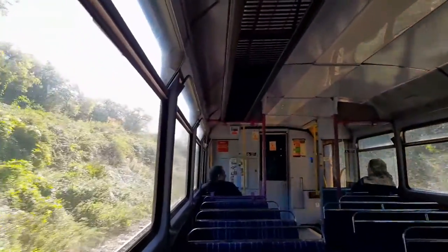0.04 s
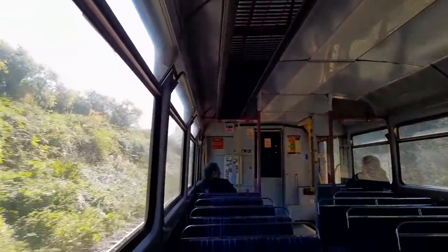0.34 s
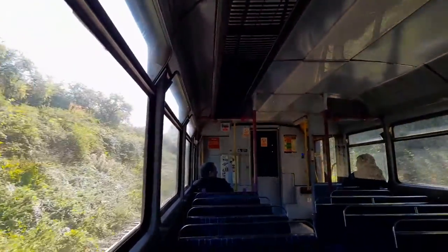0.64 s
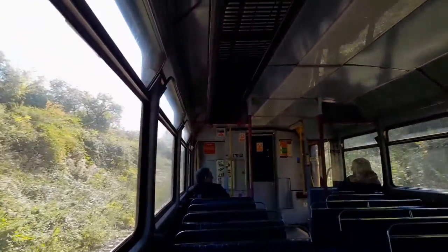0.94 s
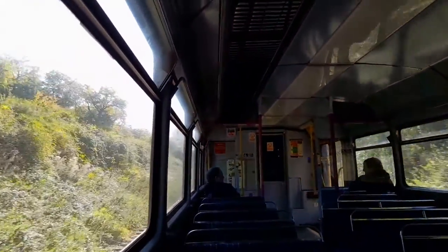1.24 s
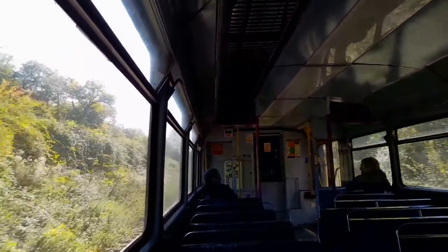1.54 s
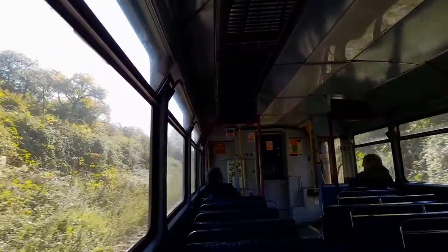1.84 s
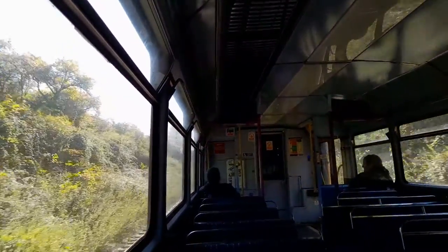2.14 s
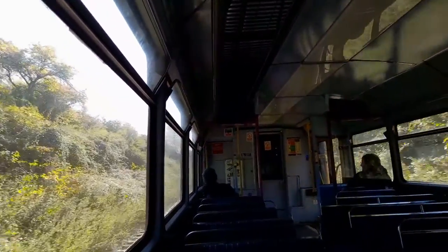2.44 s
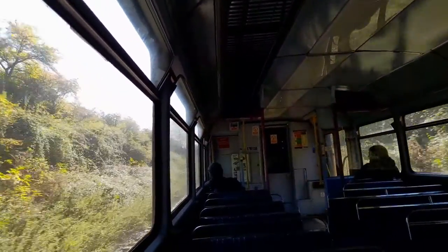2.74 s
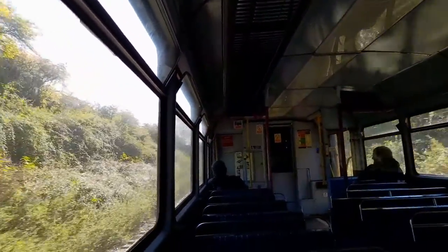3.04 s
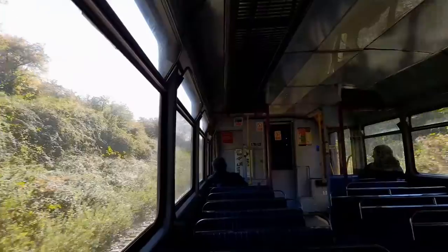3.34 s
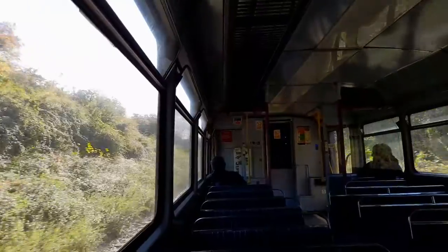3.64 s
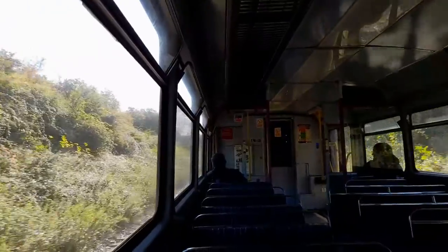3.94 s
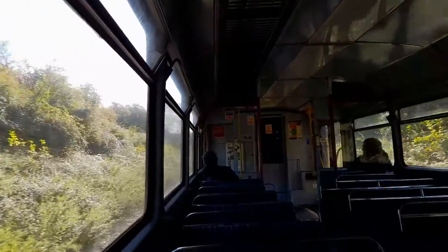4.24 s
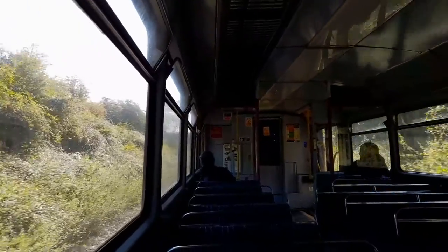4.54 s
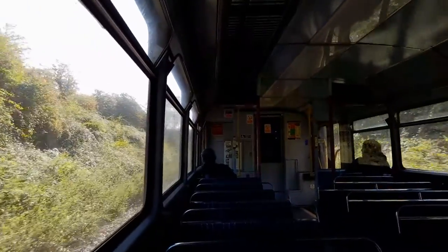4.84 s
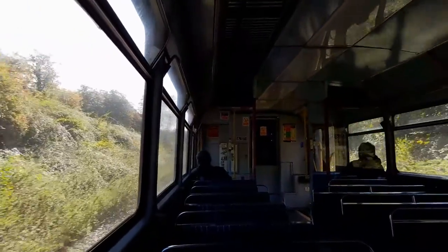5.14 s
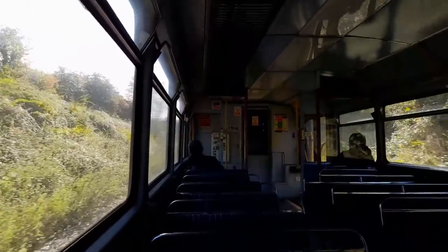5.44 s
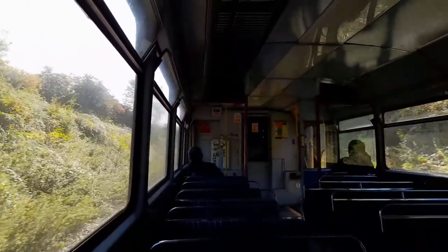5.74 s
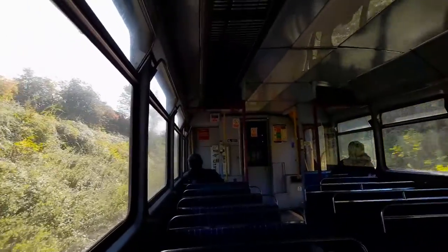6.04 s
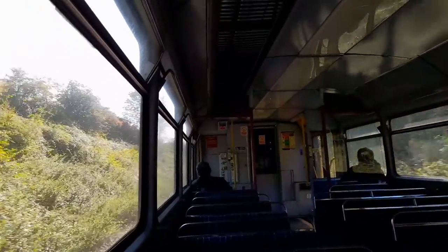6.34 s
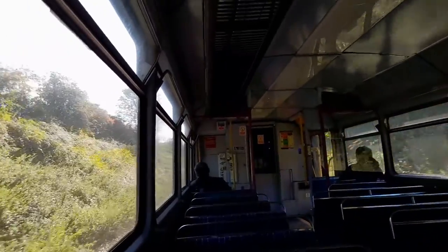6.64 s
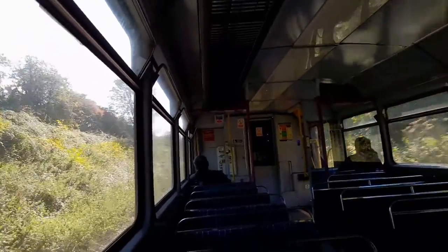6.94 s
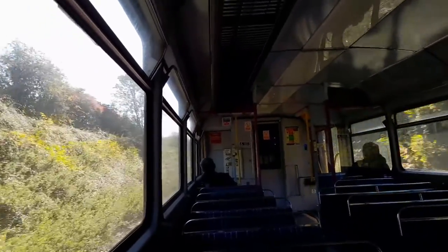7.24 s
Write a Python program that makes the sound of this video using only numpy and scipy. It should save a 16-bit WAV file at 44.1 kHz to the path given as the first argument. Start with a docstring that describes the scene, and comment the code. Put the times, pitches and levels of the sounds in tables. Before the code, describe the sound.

From a passenger seat in a moving train, a low, pulsing diesel drone blends with rumble and rolling wheel noise, and an uneven wheel drums softly under the floor. Regular thumps from the track joints soon begin, setting off short metal clanks and rattles of loose doors and windows. The carriage booms now and then, trim ticks lightly close by, and the thumps bunch together at the end.

```python
"""Inside a diesel railcar running at a steady speed on jointed track.
From the start two underfloor engines beat over the rumble of the body and the roar of the wheels,
an out-of-round wheel drums the floor once a turn, and small fittings tick and sizzle nearby.
From 0.7 s a rail joint every 0.8 s thumps up through the floor, often with a clank of steel and a chatter
of doors and windows. The body booms in occasional dips; after 6.3 s the thumps come in a quick run."""
import sys
import numpy as np
from scipy import signal
from scipy.fft import rfft, irfft
from scipy.io import wavfile

SR = 44100
rng = np.random.default_rng(int(sys.argv[2]) if len(sys.argv) > 2 else 0)


def wrap_up_sound(samples):
    """Save the sound to the file named by the first command line argument, as 16-bit audio."""
    columns = np.atleast_2d(samples).T
    # keep every value between -1 and 1, then stretch to whole-number steps
    tamed = np.clip(columns, -1, 1)
    steps = np.round(tamed * 32767).astype(np.int16)
    wavfile.write(sys.argv[1], SR, steps)


N = 321489
TIME, FREQ = np.arange(N) / SR, np.fft.rfftfreq(N, 1 / SR)


def amp(db):
    """Amplitude ratio of a level in decibels."""
    return 10 ** (np.asarray(db) / 20)


def unit(x):
    """Normalisation to rms 1."""
    return x / np.sqrt(np.mean(x ** 2) + 1e-20)


def over_hz(points):
    """Interpolation on a logarithmic frequency axis."""
    hz, value = np.transpose(points)
    return np.interp(np.log(FREQ + 1), np.log(hz + 1), value)


def over_time(rows):
    """Gain per sample, interpolated in decibels."""
    return amp(np.interp(TIME, *np.transpose(rows)))


def band(points):
    """Band-pass spectrum in dB, falling 60 dB per octave beyond its end points."""
    octaves_outside = np.maximum(np.log2(points[0][0] / (FREQ + 1)), np.log2((FREQ + 1) / points[-1][0]))
    return over_hz(points) - 60 * np.maximum(octaves_outside, 0)


def resonances(modes):
    """Each mode adds a Lorentzian peak to a spectrum in dB."""
    return sum(db / (1 + (2 * (FREQ - hz) / width) ** 2) for hz, width, db in modes)


def wander(rate_hz):
    """Random modulation: low-pass noise of rms 1."""
    return unit(irfft(rfft(rng.standard_normal(N)) * np.exp(-(FREQ / rate_hz) ** 2), N))


def steady(x, seconds):
    """Division by the running rms evens out swells slower than the given time."""
    window = np.exp(-(FREQ * seconds) ** 2)
    power = np.abs(irfft(rfft((x ** 2).mean(0)) * window, N))
    return x / np.sqrt(power + 1e-9)


def blow(start_s, rise_s, t60_s):
    """Envelope of a damped response: a quick rise to 1, then exponential decay."""
    age = np.maximum(TIME - start_s, 0)
    shape = (1 - np.exp(-age / rise_s)) * np.exp(-np.log(1000) * np.minimum(age / t60_s, 10))
    return shape / (shape.max() + 1e-9)


def contacts(per_s):
    """Poisson process: independent impacts of random size, rms 1."""
    return unit(rng.standard_normal(N) * (rng.random(N) < per_s / SR))


# likeness of the sound at the two ears: frequency_hz, coherence_ratio
COHERENCE = [(30, .99), (90, .98), (150, .99), (250, 0.82), (500, 0.59), (800, 0.17), (1200, 0)]
def diffuse(shape_db):
    """Diffuse field: long waves reach both ears alike, short waves are uncorrelated."""
    a, b = rfft(rng.standard_normal((2, N)))
    coherence = np.clip(over_hz(COHERENCE), 0, 1)
    mid, side = a * np.sqrt(1 + coherence), b * np.sqrt(1 - coherence)
    return unit(irfft(np.array([mid + side, mid - side]) * amp(shape_db), N))


def ring_out(force, shape_db, t60_s):
    """Convolution: each impact excites the same decaying response in the saloon."""
    tail = (diffuse(shape_db) * blow(0, rise_s=0.0006, t60_s=t60_s))[:, :SR // 3]
    return signal.oaconvolve(force[None], tail / np.sqrt(np.sum(tail ** 2) / 2), axes=1)[:, :N]


# response of the car body: frequency_hz, density_db
BODY_SPECTRUM = [(20, -26), (27, -21), (35, -20), (41, -7.5), (46, 5), (55, -1), (67, 9.5), (75, 2),
                 (84, 2), (98, 3.5), (113, -1.5)]
# rumble from the roughness of the track: time_s, level_db
TRACK_ROUGHNESS = [(0, -27.5), (.5, -29.5), (.95, -27), (1.4, -26.5), (1.8, -29), (2.05, -28.5), (2.5, -31),
                   (2.65, -34), (2.85, -25), (3.3, -30), (3.7, -29), (4.12, -26), (4.35, -28), (4.8, -29),
                   (5.3, -30.5), (5.9, -26.5), (6.35, -30), (6.7, -25), (7.29, -27)]
def body_rumble(gain_db=0.87, lumpy_db=0.9):
    """Random forcing: rough track drives the low resonances of the body unevenly."""
    rumble = over_time(TRACK_ROUGHNESS) * steady(diffuse(band(BODY_SPECTRUM)), seconds=0.21)
    return amp(gain_db + lumpy_db * wander(rate_hz=31.0)) * rumble


# partials of an engine: firing_rate_ratio, level_db
ENGINE_ORDERS = [(.5, -13.5), (1, -1.5), (1.5, -17.5), (2, -20), (2.5, -47), (3.5, -29), (6, -25)]
# drone of each engine: time_s, firing_hz, level_db
NEAR_DRONE = [(0, 80.18, -29.0), (0.2, 80.56, -30.5), (0.45, 79.81, -23.0), (0.75, 79.62, -28.5),
              (1.05, 78.96, -39.0), (1.7, 79.71, -30.5), (2.4, 80.76, -25.5), (2.8, 79.36, -28.0),
              (3.1, 79.15, -35.5), (3.5, 79.45, -31.5), (4.1, 80.29, -26.0), (4.7, 79.92, -28.0),
              (5.2, 79.11, -32.5), (5.9, 79.69, -28.0), (6.3, 80.2, -29.0), (6.6, 78.07, -41.5),
              (7, 80.15, -30.5), (7.29, 80.17, -27.0)]
FAR_DRONE = [(0, 87.59, -33.0), (0.8, 87.33, -35.0), (1.2, 87.5, -31.5), (1.9, 87.7, -35.0),
             (2.4, 87.72, -27.0), (2.75, 87.1, -31.5), (3.2, 87.92, -28.5), (3.85, 88.5, -41.5),
             (4.25, 88.15, -28.5), (4.65, 88.39, -33.0), (5, 86.29, -41.0), (5.5, 88.39, -41.5),
             (5.9, 87.58, -25.0), (6.3, 87.32, -34.5), (6.7, 88.66, -33.5), (7.29, 88.43, -33.5)]
# brief surges of both drones: centre_s, lift_db
DRONE_SURGES = [(.43, 3), (2.48, 2.5), (3.95, 2), (4.18, 0), (5.91, 4)]
def engines(gain_db=0.5, uneven_db=1.5, left_lead_rad=0.23, in_step_s=0.028, surge_s=0.031):
    """Beating: two engines fire at slightly different rates, so their sum throbs."""
    out = np.zeros((2, N))
    lead = np.array([[left_lead_rad], [0]])  # the saloon's standing wave: the left ear leads
    offsets = rng.random(len(ENGINE_ORDERS))
    for rows in (NEAR_DRONE, FAR_DRONE):
        time_s, firing_hz, level_db = np.transpose(rows)
        cycles = np.cumsum(np.interp(TIME, time_s, firing_hz)) / SR
        cycles -= np.interp(in_step_s, TIME, cycles)
        hum = sum(amp(db) * np.sin(2 * np.pi * (order * cycles + offset) + lead)
                  for (order, db), offset in zip(ENGINE_ORDERS, offsets))
        out += np.interp(TIME, time_s, amp(level_db)) * amp(uneven_db * wander(rate_hz=4.7)) * unit(hum)
    surge_db = sum(db * np.exp(-((TIME - centre_s) / surge_s) ** 2) for centre_s, db in DRONE_SURGES)
    return amp(gain_db + surge_db) * out


def wheel_bump(turns_hz=4.643, low_spot_s=0.074, sharpness=1.6):
    """Periodic forcing: a pulse rises to 1 each time the wheel's low spot meets the rail."""
    return np.exp(sharpness * (np.cos(2 * np.pi * turns_hz * (TIME - low_spot_s)) - 1))


# response of the floor: frequency_hz, density_db
FLOOR_SPECTRUM = [(116, 5.5), (132, 4.5), (147, 2.5), (165, 1.5), (184, 7), (205, 0.5), (224, 3),
                  (243, -3.5), (256, -8)]
# how hard the out-of-round wheel bears on the rail at each turn: time_s, lift_db
WHEEL_LOADING = [(0, 6.5), (1.3, 9.5), (2.0, 7.5), (3.6, 7.5), (4.4, 5), (5.4, 8), (6.2, 3), (6.6, 6),
                 (7.29, 8)]
def floor_drumming(level_db=-35.0):
    """Amplitude modulation: the out-of-round wheel swells the floor's noise once a turn."""
    vibration = steady(diffuse(band(FLOOR_SPECTRUM)), seconds=0.46)
    return amp(level_db) * over_time(WHEEL_LOADING) ** wheel_bump() * vibration


# midrange of the wheels on the rails: frequency_hz, density_db
ROAR_SPECTRUM = [(258, 2), (310, 2.5), (355, -2), (440, -3), (478, 1), (530, -2), (620, -6), (750, -7),
                 (840, -7), (910, -15), (1050, -19.5)]
def wheel_roar(level_db=-32.0, bump_db=1.57, uneven_db=1.0):
    """Rolling noise: the wheels roar on the rails, a little louder once a turn."""
    gain = amp(level_db + bump_db * wheel_bump() + uneven_db * wander(rate_hz=14.0))
    return gain * steady(diffuse(band(ROAR_SPECTRUM)), seconds=0.085)


# treble of the rolling noise: frequency_hz, density_db
HISS_SPECTRUM = [(1000, 2), (1350, 1.1), (1700, 0.5), (1900, -1.1), (2300, -5), (2950, -9), (3700, -13.5),
                 (4600, -17.5), (5600, -18.5), (6500, -22.5), (7300, -21.5), (7900, -29.5), (10000, -29.5),
                 (15500, -33)]
# modes of the wheel discs: centre_hz, width_hz, lift_db
DISC_MODES = [(2000, 68, 2.5), (2524, 120, 5), (3270, 116, 7), (4195, 380, 7.5), (5110, 220, 6),
              (6050, 200, 3.5), (7030, 350, 3.5)]
# hiss along the track: time_s, level_db
HISS_CURVE = [(0, -44), (.55, -44.5), (1.35, -45), (1.6, -44.5), (1.95, -44.5), (2.3, -44), (2.8, -45.3),
              (3.2, -45), (3.55, -45.6), (3.85, -44), (4.2, -44), (4.6, -44.5), (5.2, -44.5), (6.5, -45),
              (7.29, -44)]
def wheel_hiss(jolt_db=2.1, flutter_db=0.58):
    """Resonant filtering: the wheel discs ring faintly in a hiss that swells after each jolt."""
    hiss = over_time(HISS_CURVE) * diffuse(band(HISS_SPECTRUM) + resonances(DISC_MODES))
    return amp(jolt_db * jolts() + flutter_db * wander(rate_hz=20.0)) * hiss


# response of small metal fittings: frequency_hz, density_db
FITTING_SPECTRUM = [(6000, -20), (9800, -8), (11300, -8), (12000, -7), (12650, 0), (14000, -6), (16000, -5)]
# ticks of those fittings: start_s, level_db, left_over_right_db, pitch_hz
FITTING_TICKS = [(.355, -43, 2, 12350), (.7026, -51, 3, 11200), (.8708, -56, -1.5, 12100),
                 (1.155, -56, -1.5, 11300), (1.5846, -59, 1, 11500), (2.1399, -58, -3, 12300),
                 (2.9538, -57, 3, 11100), (3.1436, -59, -1.5, 11400), (3.2069, -50, -1.5, 11600),
                 (3.2644, -54, -1, 12600), (3.5232, -56, -2.5, 11600), (3.8231, -58, 4, 10400),
                 (4.1339, -54, -5, 11300), (4.195, -55, -2, 11600), (4.32, -54, -4, 11500),
                 (4.9494, -53, -1, 10800), (5.3745, -52, -3.5, 11100), (5.4563, -51, -2, 12100),
                 (5.6953, -52, 2, 11200), (5.878, -52, -3, 11200), (6.0026, -52.5, -5, 11000),
                 (6.308, -57, -4, 11000), (6.4371, -56, -2, 10900), (6.5723, -54, -2.5, 11600)]
def fitting_ticks(click_db=-12.0, ring_db=-8.5, ring_width_hz=850.0):
    """Impact excitation: a bright click, then a narrow band ringing at each part's own pitch."""
    noise = diffuse(band(FITTING_SPECTRUM))
    blur = np.array([wander(ring_width_hz), wander(ring_width_hz)])
    out = np.zeros((2, N))
    for start_s, db, pan_db, hz in FITTING_TICKS:
        click = amp(click_db) * blow(start_s, rise_s=0.0015, t60_s=0.1) * noise
        ring = amp(ring_db) * blow(start_s, rise_s=0.003, t60_s=0.15) * np.sin(2 * np.pi * hz * TIME)
        out += amp([[db + pan_db / 2], [db - pan_db / 2]]) * (click + blur * ring)
    return out


# sizzle of loose trim: frequency_hz, density_db
TRIM_SPECTRUM = [(6000, 4.5), (8000, 0), (9700, -5.5), (11300, 2.5), (13000, -6), (15500, -7)]
# modes of its faint tinkles: centre_hz, width_hz, lift_db
TRIM_MODES = [(10550, 300, 3), (11250, 350, 6), (11920, 150, 2), (12600, 300, 4)]
# bursts of shaking: centre_s, half_length_s, level_db
TRIM_FLURRIES = [(0, 0.058, -58), (.17, 0.16, -68), (0.392, 0.067, -58), (.69, .04, -66), (.89, 0.052, -63),
                 (.98, .03, -68), (1.62, 0.12, -66), (2.41, .04, -65), (3.28, .04, -70), (3.67, .05, -71),
                 (4.25, 0.29, -67), (6.612, .05, -63), (6.832, .05, -68), (7.28, .04, -67)]
def loose_trim(sizzle_db=-1.7, grain_db=1.5, tinkle_db=-8.5, rest_db=-67.0, tremble_db=1.3):
    """Contact noise: vibrating trim sizzles and tinkles, now and then breaking into a flurry."""
    sizzle = amp(sizzle_db + grain_db * wander(rate_hz=31.0)) * diffuse(band(TRIM_SPECTRUM))
    shape_db = band(FITTING_SPECTRUM) + resonances(TRIM_MODES)
    tinkles = amp(tinkle_db) * ring_out(contacts(per_s=130.0), shape_db, t60_s=0.11)
    flurries = sum(amp(db) * np.exp(-((TIME - centre_s) / half_s) ** 2)
                   for centre_s, half_s, db in TRIM_FLURRIES)
    tremble = amp(rest_db + tremble_db * wander(rate_hz=10.0))
    return (tremble + flurries) * (sizzle + tinkles)


# modes of the metal door and window frames: centre_hz, width_hz, lift_db
FRAME_RESONANCES = [(1920, 450, 7), (2460, 260, 4), (3320, 240, 6.5), (4100, 250, 3.5), (4930, 420, 5.5),
                    (5650, 160, 6), (7120, 340, 7.5)]
# doors and windows chattering: start_s, length_s, level_db, centre_hz, spread_octaves
PANEL_RATTLES = [(0., 0.021, -44.5, 5400, 1.1), (0.06, 0.11, -48.5, 2150, 0.49),
                 (0.203, 0.045, -54, 5800, 0.56), (0.35, 0.105, -50.5, 5240, 1.2),
                 (0.73, 0.047, -44, 2700, 0.75), (.855, .04, -59, 7000, .6), (1.146, .06, -59, 6000, .5),
                 (1.555, .09, -58, 3500, .7), (2.265, 0.086, -50.5, 2000, 0.74),
                 (2.342, 0.025, -42, 1700, 1), (2.363, 0.085, -48.5, 3200, 0.84),
                 (3.162, 0.035, -47, 2000, 0.54), (3.23, .07, -55, 2400, .7),
                 (3.978, 0.022, -44, 3000, 0.92), (4.0, 0.055, -43, 1850, 1.1), (4.13, .16, -61, 6000, .7),
                 (4.77, 0.073, -46.5, 1720, 0.64), (6.13, 0.1, -60, 6500, 0.48),
                 (6.748, 0.085, -47.5, 2400, 1.2), (7.217, 0.12, -43, 2000, 1.03)]
def panel_rattles(gain_db=-1.2, contacts_per_s=2600.0, skew=0.35, detune=0.035):
    """Repeated impact: a loose panel excites the modes of its frame, no two frames tuned alike."""
    out = np.zeros((2, N))
    for start_s, length_s, db, centre_hz, spread_octaves in PANEL_RATTLES:
        progress = np.clip((TIME - start_s) / length_s, 0, 1)
        envelope = np.sqrt(np.abs(np.sin(np.pi * progress ** skew)))  # hardest early on
        force = contacts(contacts_per_s) * envelope
        force *= np.sqrt(length_s * SR / (np.sum(force ** 2) + 1e-9))  # rms 1 over the rattle
        panel_db = -30 * np.log10(1 + (np.log2((FREQ + 1) / centre_hz) / spread_octaves) ** 2)
        tuning = 1 + detune * rng.uniform(-0.91, 1)
        frame_db = resonances([(hz * tuning, width, lift) for hz, width, lift in FRAME_RESONANCES])
        out += amp(db) * ring_out(force, panel_db + frame_db, t60_s=0.26)
    return amp(gain_db) * out


# modes of the steel running gear: pitch_ratio, level_db, t60_s
GEAR_MODES = [(0.999, -2.5, 0.2), (1.08, -13, 0.13), (1.15, -8.5, 0.1), (2.3, -20.5, 0.18)]
# blows on the gear: start_s, level_db, pitch_hz
GEAR_CLANKS = [(.724, -24, 842), (.915, -32, 850), (1.54, -28, 814), (1.77, -29, 853), (2.02, -31.5, 860),
               (2.348, -28.5, 802), (2.41, -35, 830), (2.868, -30, 857), (3.161, -33, 838), (3.3, -32, 835),
               (3.976, -26.5, 915), (4.585, -30, 843), (5.01, -31, 820), (5.585, -31, 833),
               (6.06, -33, 825), (6.41, -34, 843), (6.915, -29, 820), (7.19, -31, 830)]
def gear_clanks(rise_s=0.0025):
    """Modal decay: struck steel rings briefly as a sum of damped, inharmonic sinusoids."""
    out = np.zeros((2, N))
    for start_s, db, hz in GEAR_CLANKS:
        for ratio, mode_db, t60_s in GEAR_MODES:
            ringing = (TIME >= start_s) & (TIME < start_s + t60_s)
            age = TIME[ringing] - start_s
            envelope = (1 - np.exp(-age / rise_s)) * np.exp(-np.log(1000) * age / t60_s)
            phase = 2 * np.pi * (hz * ratio * age + rng.random((2, 1)))
            out[:, ringing] += amp(db + mode_db) * envelope * np.sin(phase)
    return out


# the car dropping into dips: start_s, peak_db, pitch_hz
DIP_BOOMS = [(0.691, -25, 95), (1.52, -20, 93.5), (1.99, -26, 44), (2.311, -24, 104), (2.43, -18, 44),
             (3.3, -29, 43), (4.049, -18, 52), (4.142, -23, 73), (7.17, -19.5, 68.5)]
def body_booms():
    """Free vibration: after a dip the whole body swings for a few slow cycles."""
    out = np.zeros(N)
    for start_s, db, hz in DIP_BOOMS:
        phase = 2 * np.pi * (hz * (TIME - start_s) + rng.random())
        out += amp(db) * blow(start_s, rise_s=0.059, t60_s=0.13) * np.sin(phase)
    return out


# floor thumps from rail joints and the hardest turns of the out-of-round wheel:
# start_s, thud_db, pitch_hz, knock_db
FLOOR_THUMPS = [(0.719, -12, 163, -26.5), (0.916, -24, 182, -46), (1.533, -17, 182, -30),
                (2.346, -26, 151, -32), (3.162, -27, 153, -34), (3.972, -36, 266, -29),
                (4.774, -18, 178.4, -34), (5.584, -18.5, 146, -30), (6.39, -21.5, 160, -34),
                (6.497, -16, 173, -32.5), (6.724, -17.5, 185, -35), (6.936, -17.5, 185.5, -31.5),
                (7.188, -15, 139, -28)]
# knock of the running gear: frequency_hz, density_db
KNOCK_SPECTRUM = [(250, 11), (480, 4), (700, 5.5), (900, -2.5), (1020, -10.5), (1200, -22), (1900, -21.5),
                  (3500, -32)]
def floor_thumps(thud_gain_db=-3.5, octave_db=-18.0):
    """Structure-borne sound: each blow swings the floor for a few cycles under a knock of the gear."""
    thud, knock = np.zeros(N), np.zeros(N)
    for start_s, thud_db, hz, knock_db in FLOOR_THUMPS:
        phase = 2 * np.pi * (hz * (TIME - start_s) + rng.random())
        swing = np.sin(phase) + amp(octave_db) * np.sin(2 * phase)
        thud += amp(thud_db) * blow(start_s, rise_s=0.028, t60_s=0.1) * swing
        knock += amp(knock_db) * blow(start_s, rise_s=0.0073, t60_s=0.48)
    return amp(thud_gain_db) * thud + knock * diffuse(band(KNOCK_SPECTRUM))


def jolts(rise_s=0.015, t60_s=0.5):
    """Linear response: the thumps shake the car in proportion to their knocks; 1 at the hardest."""
    shake = sum(amp(knock_db) * blow(start_s, rise_s, t60_s) for start_s, _, _, knock_db in FLOOR_THUMPS)
    return shake / shake.max()


# level difference between the ears: frequency_hz, left_over_right_db
SEAT_BALANCE = [(60, -3.5), (92, -1), (140, -2.5), (210, 1.5), (330, -2), (500, -2), (770, -0.5),
                (1170, -1), (1790, -2.5), (2740, -0.5), (4190, -1.5), (6410, -3), (9810, 0), (15000, -1)]
def scene():
    """Superposition of all sources at a window seat, with the open saloon to the right."""
    saloon = body_rumble() + engines() + body_booms()
    saloon += floor_drumming() + wheel_roar() + wheel_hiss()
    saloon += floor_thumps() + gear_clanks() + panel_rattles() + loose_trim() + fitting_ticks()
    left_db = over_hz(SEAT_BALANCE) / 2
    return irfft(rfft(saloon) * amp([left_db, -left_db]), N)


def record(dry, cutoff_hz=15720):
    """Band limiting: a steep linear-phase low-pass removes the highest treble."""
    lowpass = signal.firwin(1023, cutoff_hz, window=("kaiser", 9), fs=SR)
    return signal.oaconvolve(dry, lowpass[None], "same")


dry = scene()
out = record(dry)
wrap_up_sound(out)
```